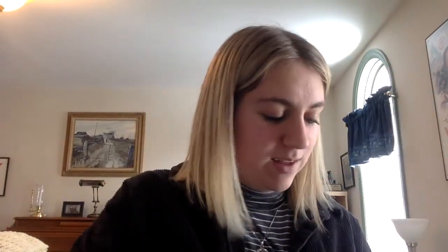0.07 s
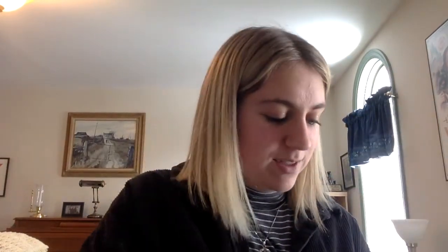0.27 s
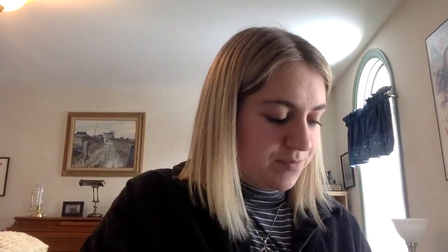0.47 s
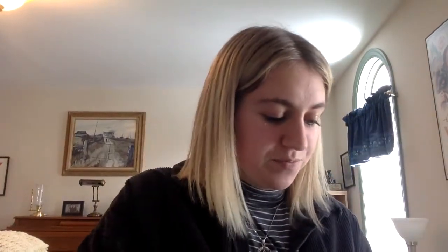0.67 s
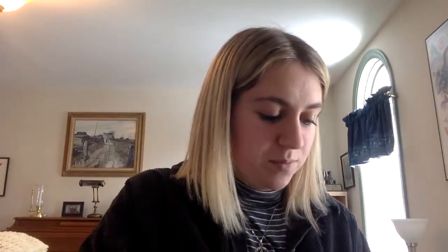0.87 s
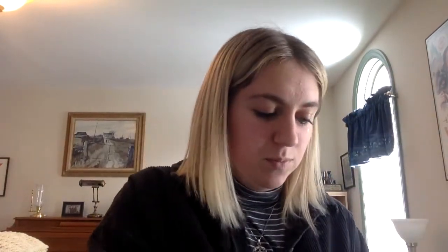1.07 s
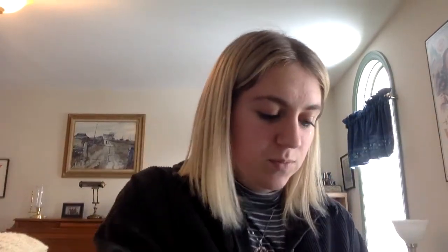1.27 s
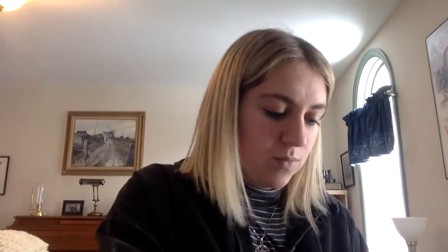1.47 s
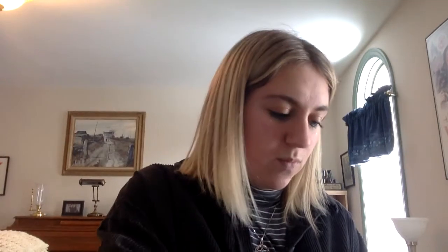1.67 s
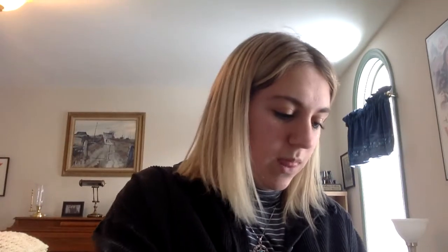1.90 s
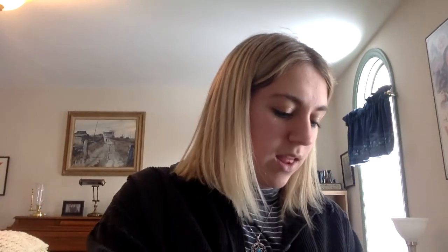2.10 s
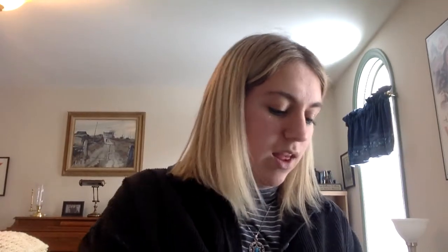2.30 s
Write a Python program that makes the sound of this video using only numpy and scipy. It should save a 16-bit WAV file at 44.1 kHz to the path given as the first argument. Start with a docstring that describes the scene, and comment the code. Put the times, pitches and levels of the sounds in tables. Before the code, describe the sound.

Small plastic discs slide softly, then clatter onto a plastic tray and rattle to rest.

```python
"""Small plastic counting discs are handled on a plastic tray in a quiet room.
First they slide softly, creaking as they stick and slip, and light taps follow. Just after
one second a dull bump shakes the tray, with a click and more sliding. From about 1.5 seconds
a handful of discs clatters down, each knocking the tray and ringing briefly.
They rattle to rest, leaving only the faint noise of the room."""
import sys
import numpy as np
from scipy import signal
from scipy.io import wavfile
from scipy.ndimage import uniform_filter1d

SR = 44100
rng = np.random.default_rng(int(sys.argv[2]) if len(sys.argv) > 2 else 0)


def pcm_store(signal):
    """Save signal as 16-bit PCM."""
    levels = np.round(np.clip(np.atleast_2d(signal), -1, 1) * 32767)
    wavfile.write(sys.argv[1], SR, levels.astype(np.int16).T)


N = 103458
AGE = np.arange(SR // 4) / SR  # seconds since a hit

# Each disc landing: t/s, knock level/dB, snap level/dB, high ring level/dB, low ring level/dB, low f/Hz
LANDINGS = [(1.118, -21.5, -22, -55, -40, 5820), (1.2304, -30.5, -51, -58, -74, 5800),
            (1.5447, -15.5, -19.5, -13.5, -42, 6360), (1.573, -18.5, -20.5, -22.5, -24.5, 6240),
            (1.618, -19.5, -26, -29, -53.5, 6200), (1.636, -23.5, -35, -37.5, -33, 6180),
            (1.6644, -21, -22, -38, -49.5, 6240), (1.6898, -17, -22.5, -23, -34.5, 7770),
            (1.7281, -20.5, -31, -28, -46.5, 7330), (1.7511, -19.5, -15, -17, -28.5, 7500),
            (1.758, -18.5, -18, -13, -25.5, 7430), (1.7698, -21.5, -12.5, -8, -15.5, 5980),
            (1.778, -30, -21.5, -6, -14.5, 7510), (1.7977, -22, -33.5, -34.5, -47, 5780),
            (1.8076, -22, -8, -32.5, -17.5, 5936), (1.862, -26.5, -21.5, -17.5, -22, 6020),
            (1.872, -22.5, -13.5, -38, -26.5, 6210), (1.8766, -12, -15, -19, -40.5, 7500),
            (1.879, -18.5, -27, -33, -40.5, 5920), (1.901, -35, -17, -19.5, -25.5, 7370),
            (1.9241, -27, -17.5, -13.5, -19, 7560), (1.9316, -26.5, -13.5, -39, -23, 7390),
            (1.938, -29, -26, -9, -18.5, 7450), (1.9836, -28, -21, -15, -19, 7570),
            (2.0189, -17.5, -12, -23, -43, 7670), (2.025, -23.5, -9, -20, -23.5, 6420),
            (2.119, -19, -16, -18, -38, 5800), (2.1909, -37.5, -40, -32, -38, 7470)]
# A disc's high tones: f/Hz, level/dB, fade/s (the time to die away by 60 dB)
HIGH_TONES = [(11430, -5, 0.019), (11316, -3.5, .017), (16400, -6.5, 0.017)]
# A disc's low tones: multiple of its pitch, level/dB, fade/s
LOW_TONES = [(1, -1.5, 0.042), (1.133, -9, 0.05)]
DISC_SPREAD = .005  # discs differ in pitch by about this share
def falling_discs(snap_boost_db=2, small_disc_hz=7000):
    """Each disc snaps, rings and knocks the tray; higher-pitched ones ring with one more tone."""
    out = np.zeros(N)
    for start, knock_db, snap_db, high_db, low_db, hz in LANDINGS:
        high = amp(high_db) * ring(HIGH_TONES, spread=DISC_SPREAD, uneven_db=3)
        low = amp(low_db) * ring(LOW_TONES if hz > small_disc_hz else LOW_TONES[:1], hz)
        hit = amp(knock_db) * tray_knock() + amp(snap_db + snap_boost_db) * edge_snap()
        add(out, start, hit + high + low)
    return out


# The tray's blur of countless tones: f/Hz, level/dB, fade/s
TRAY_BLUR = [(173, -33.5, 0.094), (261, 3, 0.095), (840, -3, 0.054), (1150, -5, 0.08), (1500, 4, 0.041),
             (3890, 6, .025), (6200, -13.5, .018), (9800, -41.5, 0.01)]
# The tray's few clear tones: f/Hz, level/dB, fade/s
TRAY_TONES = [(282.4, -6, 0.15), (768, -7.5, 0.12), (903, 2, 0.051), (1740, -7.5, 0.13),
              (2289, 10.5, 0.029), (2997, -3.5, 0.055)]
def tray_knock():
    """The tray answers a disc with a short crack, a blur of ringing and a few clear tones."""
    blur = fading_noise(TRAY_BLUR, size=len(AGE), column=2)
    crack = 1.21 * fade(0.01) * rng.standard_normal(len(AGE))
    body = unit_hit(colour(blur + crack, TRAY_BLUR))
    tones = amp(-6) * ring(TRAY_TONES, spread=0.0071, uneven_db=5.5)
    return unit_hit(keep_band(body + tones, 170, "high"))


# The tone colour of a snap: f/Hz, level/dB
SNAP_COLOUR = [(1500, -35), (4500, -6), (9500, -5.5), (13500, 1.5)]
def edge_snap(fade_s=0.0074):
    """Hard edges meet in a tiny burst of bright noise."""
    return unit_hit(colour(fade(fade_s) * rng.standard_normal(len(AGE)), SNAP_COLOUR))


# How the rattle swells and dies: t/s, level/dB
RATTLE_LEVELS = [(1.737, -35.5), (1.765, -21), (1.81, -30.5), (1.843, -30.5), (1.87, -34.5), (1.915, -43.5),
                 (1.982, -29), (2.103, -40), (2.128, -26), (2.174, -36), (2.214, -43.5), (2.236, -67.5)]
# One contact's mix, each as level/dB: knock, snap, high ring, low ring, rim ring
CONTACT_MIX = (-4.5, 2, -2, -10, -11.5)
def rattle(discs=5, contacts_per_s=380, spread_db=4.5, low_hz=7320, rim_hz=4910):
    """Several discs wobble and jostle in quick, small contacts."""
    level = amp(np.interp(np.arange(N) / SR, *np.transpose(RATTLE_LEVELS), left=-120, right=-120))
    out = np.zeros(N)
    for _ in range(discs):
        touches = rng.random(N) < contacts_per_s / discs / SR
        strength = amp(spread_db * rng.uniform(-0.91, 1.1, N))
        parts = [tray_knock(), edge_snap(), ring(HIGH_TONES, spread=DISC_SPREAD)]
        parts += [ring(LOW_TONES, hz, spread=DISC_SPREAD) for hz in (low_hz, rim_hz)]
        contact = sum(amp(db) * part / np.linalg.norm(part) for db, part in zip(CONTACT_MIX, parts))
        out += signal.fftconvolve(unit_level(touches * strength) * level, contact)[:N]
    return out / np.sqrt(discs)


# Each bump of the tray: t/s, level/dB
TRAY_BUMPS = [(1.092, -12.5), (1.097, -23), (1.763, -26.5)]
# The whole tray's deep tones: f/Hz, level/dB, fade/s
BUMP_TONES = [(218, -2.5, 0.039), (345, -5.5, 0.05), (444, -4, 0.05), (705, 8, 0.018), (779, -0.5, 0.088),
              (1788, -10, 0.027)]
def tray_bumps():
    """A soft blow sets the whole tray ringing with a dull sound."""
    out = np.zeros(N)
    tones = sum(amp(db) * fade(fade_s) * np.cos(2 * np.pi * hz * AGE) for hz, db, fade_s in BUMP_TONES)
    thud = unit_hit(keep_band(tones, [130, 1700]))
    for start, db in TRAY_BUMPS:
        add(out, start, amp(db) * thud)
    return out


# Each tap: t/s, push level/dB, ring level/dB, ring f/Hz
LIGHT_TAPS = [(0.4719, -63, -40.5, 1676), (0.517, -46, -46, 1750), (0.665, -75, -28, 2013),
              (.699, -64.5, -39, 2360), (0.9224, -35.5, -36, 2884), (.952, -23, -41.5, 1810),
              (0.9698, -34.5, -47.5, 1740), (0.983, -31, -58, 1150), (1.0293, -26.5, -40, 1480),
              (1.049, -25.5, -55.5, 2880)]
# A tap's tones: multiple of its pitch, level/dB, fade/s
TAP_TONES = [(.4, -19, 0.11), (1, 3, 0.039), (1.33, 1, 0.02), (2.2, -2, 0.0167)]
# The tone colour of a push: f/Hz, level/dB
PUSH_COLOUR = [(400, -57), (620, -6), (1700, 3), (2600, -4.5), (3900, -10.5), (7500, -36.5), (15000, -5)]
def light_taps():
    """Each muffled tap is one short, rounded push and a brief ring."""
    out = np.zeros(N)
    for start, push_db, ring_db, hz in LIGHT_TAPS:
        click = (AGE == 0) + 0.063 * fade(0.032) * rng.standard_normal(len(AGE))
        push = unit_hit(colour(click, PUSH_COLOUR))
        add(out, start, amp(push_db) * push + amp(ring_db) * ring(TAP_TONES, hz))
    return keep_band(out, [480, 5200])


# Each slide: start t/s, peak t/s, end t/s, swell/dB, rumble level/dB, scrape level/dB, hiss level/dB
STROKES = [(-.03, 0.11, .14, 7.5, -66.5, -40, -40), (.2, 0.34, 0.41, 13.5, -79, -68.5, -51.5),
           (0.462, 0.57, 0.66, 10.5, -87, -62.5, -46), (0.656, .68, 0.74, 12, -75, -57.5, -40),
           (0.735, .78, 0.79, 8, -60, -56, -35.5), (1.083, 1.119, 1.273, 21, -36.5, -35.5, -28),
           (1.198, 1.175, 1.383, 13.5, -76, -44, -47.5), (1.374, 1.452, 1.542, 23.5, -61, -46.5, -36.5)]
# The tone colours of the tray's rumble, the scrape and the hiss: f/Hz, level/dB
RUMBLE_COLOUR = [(60, -18), (200, 2.5), (800, -1), (1200, -4), (5000, -55)]
SCRAPE_COLOUR = [(200, -45), (1500, -21.5), (2200, 1), (3700, 2.5), (4900, 1.5), (7300, -29.5),
                 (16000, -43)]
HISS_COLOUR = [(4000, -31.5), (7500, -46), (9000, -15), (12300, -0.5), (15500, 3.5)]
def slides(edge_s=0.0082, grain_s=0.0067, grain_db=3):
    """Sliding plastic makes a grainy scrape and hiss, with the tray rumbling underneath."""
    t, out = np.arange(N) / SR, np.zeros(N)
    layers = noise(RUMBLE_COLOUR), wander(noise(SCRAPE_COLOUR)), wander(noise(HISS_COLOUR))
    for start, peak, end, swell_db, *levels in STROKES:
        swell = amp(np.interp(t, [start, peak, end], [-swell_db, 0, -swell_db]))
        on_off = np.clip(np.minimum(t - start, end - t) / edge_s + .5, 0, 1)
        out += swell * on_off * sum(amp(db) * layer for db, layer in zip(levels, layers))
    return out * amp(grain_db * wobble(N, int(grain_s * SR)))


def wander(x, depth_db=3.5):
    """As a sliding disc moves, different pitches stand out."""
    bands = signal.stft(x, nperseg=512)[2]
    patches = uniform_filter1d(rng.standard_normal(bands.shape), size=7, axis=0)  # smooth over pitch
    patches = unit_level(uniform_filter1d(patches, size=9, axis=1))  # and over time
    return unit_level(signal.istft(bands * amp(depth_db * patches), nperseg=512)[1][:N])


# Each creak: t/s, length/s, f/Hz, level/dB
TRAY_CREAKS = [(0.082, 0.048, 956, -45), (1.191, 0.073, 426, -38)]
def creaks(sag=0.074, jitter=0.077):
    """A disc sticks and slips, making the tray creak; the pitch sags as the disc slows."""
    out = np.zeros(N)
    for start, length, hz, db in TRAY_CREAKS:
        progress = np.linspace(0, 1, int(length * SR))
        pitch = hz * (1 - sag * progress ** 2 + jitter * wobble(len(progress), 120))
        phase = 2 * np.pi * np.cumsum(pitch) / SR
        swell = np.sin(np.pi * progress) ** 2
        add(out, start, amp(db) * swell * (np.sin(phase) + .5 * np.sin(2 * phase)))
    return out


# How long the room's echo lasts: f/Hz, fade/s
ECHO_FADES = [(2200, 0.29), (5000, 0.16), (9000, 0.13)]
def room_echo(x, build_s=0.018):
    """A furnished room gives every sound a short tail."""
    tail = fading_noise(ECHO_FADES, size=SR // 2, column=1)
    tail *= np.minimum(np.arange(len(tail)) / SR / build_s, 1)
    return signal.fftconvolve(x, tail / np.linalg.norm(tail))[:N]


# The tone colour of the quiet room: f/Hz, level/dB
HUSH_COLOUR = [(25, -28.5), (220, 5), (2500, -8), (8000, -14.5), (15000, -9.5)]
def room_hush(level_db=-72):
    """Faint, steady noise lies under everything."""
    return amp(level_db) * noise(HUSH_COLOUR)


def ring(tones, pitch=1, spread=0., uneven_db=0.):
    """A struck object's fading tones, whose strengths depend on where the blow lands."""
    pitch = pitch * (1 + spread * rng.standard_normal())
    out = np.zeros(len(AGE))
    for f, db, fade_s in tones:
        strength = amp(db + uneven_db * rng.standard_normal()) * rng.choice([-1, 1])
        out += strength * fade(fade_s) * np.sin(2 * np.pi * f * pitch * AGE)
    return unit_hit(out)


def fading_noise(table, size, column):
    """Countless overlapping tones: noise in which each pitch dies at its own speed."""
    hz, t, bands = signal.stft(rng.standard_normal(size), SR, nperseg=128)
    bands *= fade(look_up(table, hz, column)[:, None], t)
    return signal.istft(bands, SR, nperseg=128)[1][:size]


def noise(table):
    """Steady noise with the table's tone colour."""
    return unit_level(colour(rng.standard_normal(N), table))


def colour(x, table):
    """Makes each pitch louder or softer, as the table says."""
    log_gain = np.log(amp(look_up(table, abs(np.fft.fftfreq(4096, 1 / SR)))))
    response = np.fft.ifft(np.exp(np.conj(signal.hilbert(log_gain)))).real  # no sound before the hit
    return signal.fftconvolve(x, response[:len(response) // 2])[:len(x)]


def keep_band(x, hz, kind="band"):
    """Keeps the pitches between two limits, or above one ("high")."""
    return signal.sosfilt(signal.butter(2, hz, kind, fs=SR, output="sos"), x)


def look_up(table, hz, column=1):
    """A table's value at any pitch, gliding between rows."""
    columns = np.transpose(table)
    return np.interp(np.log(hz + 1), np.log(columns[0]), columns[column])


def wobble(size, smooth_samples):
    """Smoothed random ups and downs."""
    return unit_level(uniform_filter1d(rng.standard_normal(size), smooth_samples))


def fade(fade_s, t=AGE):
    """Dies away by 60 dB in fade_s seconds."""
    return np.exp(-np.log(1000) * t / fade_s)


def amp(db):
    """Turns decibels into a multiplier."""
    return 10 ** (np.asarray(db) / 20)


def unit_level(x):
    """Sets the average (rms) level to one."""
    return x / np.sqrt(np.mean(x ** 2) + 1e-20)


def unit_hit(x):
    """Scales a hit so its first five milliseconds have an average level of one."""
    return x / np.sqrt(np.mean(x[:220] ** 2) + 1e-20)


def add(mix, start, sound):
    """Mixes a sound in at start seconds."""
    part = mix[max(round(start * SR), 0):][:len(sound)]
    part += sound[:len(part)]


def scene():
    """All the handling sounds, close by, in a quiet room."""
    near = falling_discs() + rattle() + light_taps() + tray_bumps() + slides() + creaks()
    return (near + amp(-19.5) * room_echo(near) + room_hush())[None]


def record(dry, cut_hz=15800):
    """Rounds off the loudest peaks, then removes the very highest treble."""
    treble_cut = signal.firwin(255, cut_hz, window=("kaiser", 9), fs=SR)
    return signal.oaconvolve(np.tanh(dry), treble_cut[None], "same")


dry = scene()
out = record(dry)
pcm_store(out)
```